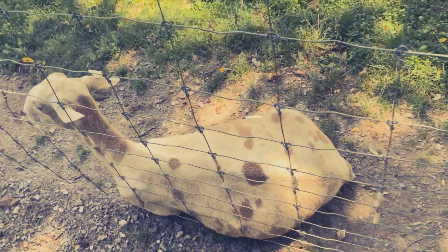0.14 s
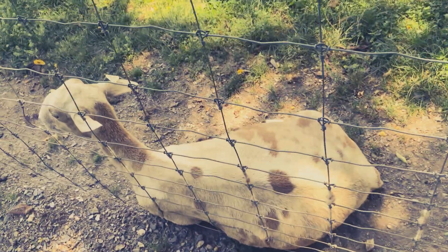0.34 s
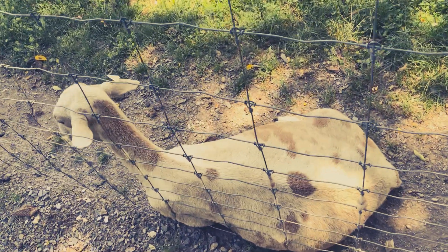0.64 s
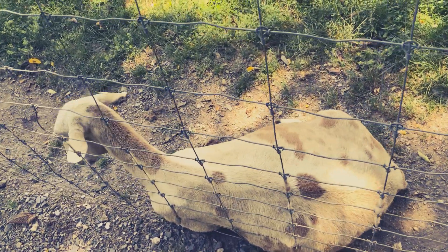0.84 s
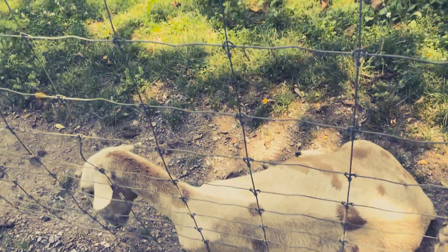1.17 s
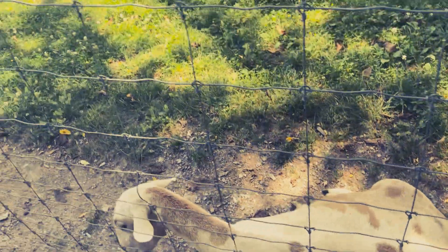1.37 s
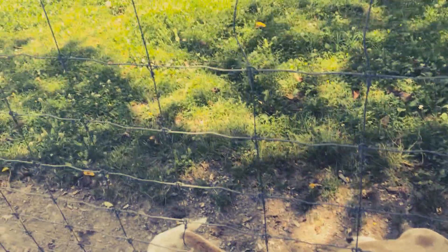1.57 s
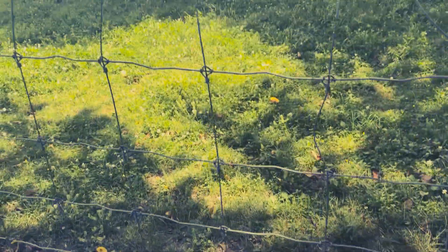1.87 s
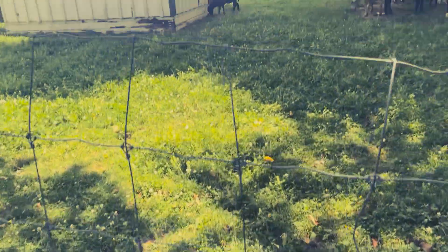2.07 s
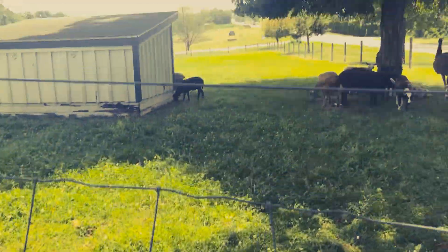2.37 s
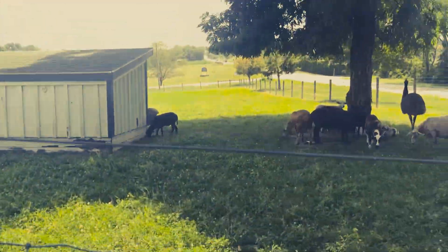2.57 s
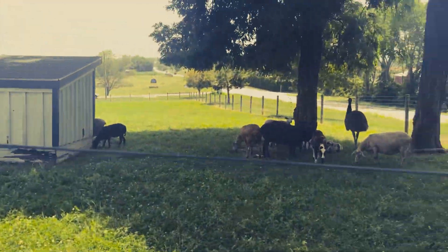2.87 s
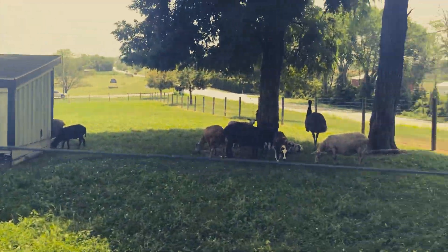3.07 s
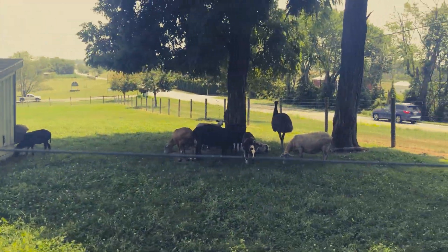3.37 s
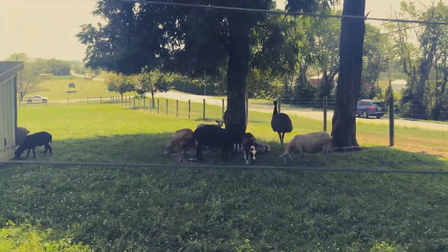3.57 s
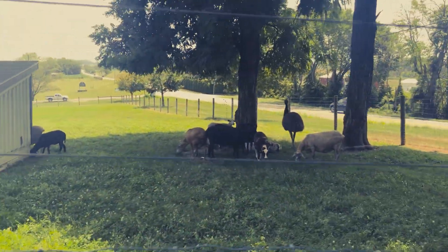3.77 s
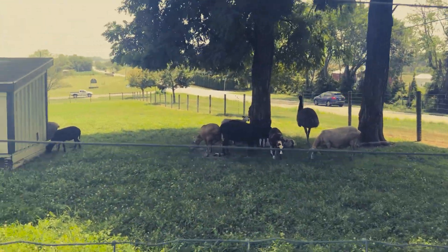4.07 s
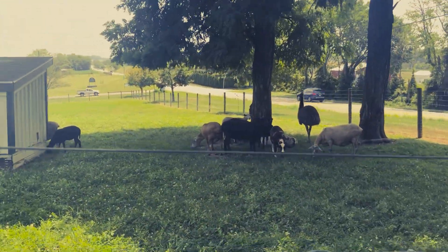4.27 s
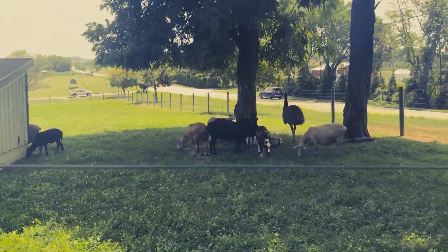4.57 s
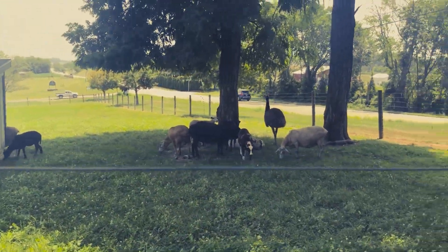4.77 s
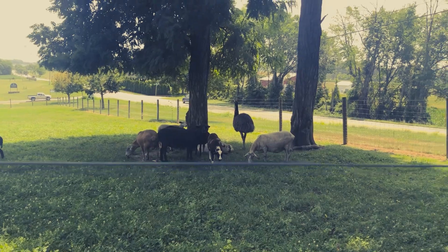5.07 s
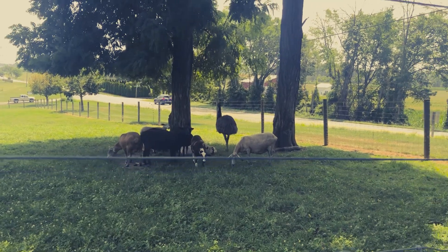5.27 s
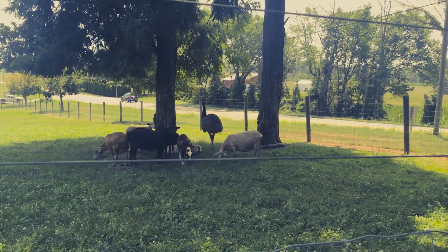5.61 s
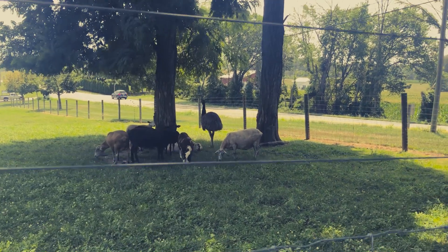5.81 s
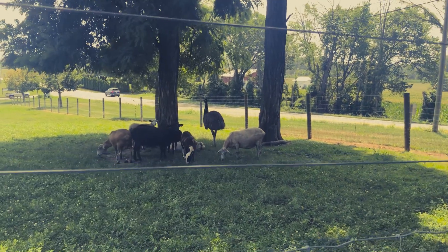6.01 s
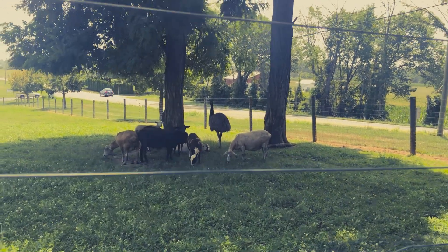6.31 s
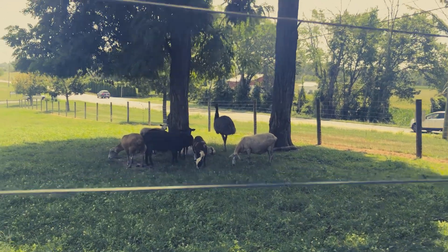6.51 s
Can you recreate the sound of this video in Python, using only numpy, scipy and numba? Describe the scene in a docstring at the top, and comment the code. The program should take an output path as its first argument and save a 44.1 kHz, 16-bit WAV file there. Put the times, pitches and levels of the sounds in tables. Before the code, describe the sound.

A sheep gives one quavering, buzzy bleat just after a car hums past a pasture, over low rumble and tyre noise.

```python
"""A pasture beside a country road, one hand-held microphone. Over low rumble and faintly rustling grass
a car drives up, engine humming and tyres roaring; it is nearest at 3.2 s, and its hum sinks as it passes.
The microphone takes a few soft bumps and puffs of wind. Just after the pass a sheep gives one quavering,
buzzy bleat of a second: its vocal folds snap shut in a train of clicks that ring in throat, nose and
mouth. Then the hum fades down the road while the tyre roar carries on."""
import sys
import numpy as np
from scipy import signal
from scipy.fft import rfft, irfft, next_fast_len
from scipy.io import wavfile
from scipy.ndimage import map_coordinates
from numba import njit

SR = 44100
rng = np.random.default_rng(int(sys.argv[2]) if len(sys.argv) > 2 else 0)


def dump(signal):
    """Clip the signal to [-1, 1] and save it as 16-bit WAV at the path in sys.argv[1]."""
    limited = np.clip(np.atleast_2d(signal).T, -1, 1)
    pcm = np.round(limited * 32767).astype(np.int16)
    wavfile.write(sys.argv[1], SR, pcm)


N = 293204
T = np.arange(N) / SR

# quavers of the bleat, short squeezes of the larynx: t/s, depth (0-1)
QUAVERS = [(3.408, 1), (3.479, 0.97), (3.548, 0.98), (3.625, 0.69), (3.697, 0.75), (3.773, 0.75),
           (3.843, 0.34), (3.913, 0.32), (3.979, 0.28), (4.02, 0.13), (4.052, .22), (4.09, 0.36),
           (4.159, 0.56), (4.232, 0.52), (4.303, 0.9)]


def sheep():
    """One bleat: each quaver lifts the pitch and chokes the buzz, which flares as the larynx lets go."""
    # course of the bleat: t/s, pitch between quavers/Hz, mouth resonance/Hz, effort/dB
    bleat = [(3.33, 172.3, 2660, -32), (3.375, 166.1, 2930, -28), (3.403, 173.5, 2850, -30.5),
             (3.432, 171.1, 3090, -32.5), (3.455, 178.8, 2820, -29), (3.478, 182.2, 2750, -30.8),
             (3.51, 180.5, 2920, -29), (3.545, 184.7, 2710, -32), (3.595, 186.4, 2710, -30),
             (3.625, 187.6, 2660, -30.5), (3.665, 189.9, 2630, -30.5), (3.74, 189.9, 2590, -31.5),
             (3.81, 193.5, 2540, -31.5), (3.89, 192.8, 2550, -31.5), (3.95, 193.8, 2590, -30),
             (4.01, 192.2, 2583, -29.5), (4.065, 191.8, 2630, -29.5), (4.12, 194.8, 2580, -29.5),
             (4.19, 191.6, 2654, -29.5), (4.232, 191.3, 2685, -27), (4.263, 184.2, 3000, -27.8),
             (4.3, 183, 2800, -29), (4.33, 174.3, 3330, -23.5)]
    pitch, mouth_hz, effort_db = in_time(bleat)
    mouth_rest_hz = 2594
    raised = np.log2(mouth_hz / mouth_rest_hz)   # octaves above rest
    choke = squeeze(delay=-0.0036, length=0.0099)
    voice = larynx(pitch, effort_db, raised, choke)
    voice = vocal_tract(voice, mouth_hz, mouth_rest_hz, raised, choke)
    return pasture(voice + peeps(), ground_s=0.00235, ground_db=-16.5, scatter_db=-15, t60=0.13)


def larynx(pitch, effort_db, raised, choke):
    """The folds start abruptly, buzz and are cut off; the harder they snap shut, the more treble."""
    start_s, stop_s = 3.367, 4.318
    push = squeeze(delay=0, length=0.009)
    release = squeeze(delay=0.0048, length=0.0093) ** 2
    slack = squeeze(delay=0.021, length=0.0067) ** 2   # only deep quavers leave the voice slack
    level_db = effort_db + 6.3 * release + 0.3 * push ** 2 - 2.8 * slack
    envelope = ramp(start_s, 0.021) * (1 - ramp(stop_s, 0.015))
    pitch = pitch * (1 + 0.19 * push)
    voice = glottis(pitch, jitter=0.00699, shimmer_db=0.5, rasp=0.015, hiss=0.0085, spit=0.16)
    voice = voice * envelope * from_db(level_db)
    # the buzz takes a moment to build, and dulls as the mouth resonance rises
    snap_db = -0.3 - 24 * (1 - ramp(start_s, 0.055)) - 32 * raised
    snap_db += release - 13 * choke ** 1.65 + 4 * slack + 4 * flare(delay=0.0033, length=0.034)
    voice = treble(voice, 5000, snap_db)
    edge_db = 0.08 * snap_db + 4.2 * release + 2.2 * drift(150) - 4.5   # no two closures are alike
    voice = treble(voice, 9300, edge_db)
    # the flow is cut off at each closure, so the pressure drops first
    return -signal.sosfilt(signal.butter(1, 380, "high", fs=SR, output="sos"), voice)


def glottis(pitch, jitter, shimmer_db, rasp, hiss, spit):
    """Each closure of the folds gives a click, a wet spit and a puff of turbulence, over a steady leak."""
    cycles = np.cumsum(pitch * (1 + jitter * drift(170))) / SR
    closures = np.interp(np.arange(1, int(cycles[-1])), cycles, np.arange(N))
    taps = np.clip(closures.astype(int)[:, None] + np.arange(-5, 7), 0, N - 1)
    clicks = np.zeros(N)
    clicks[taps] = np.sinc(taps - closures[:, None])
    turbulence = (rasp * np.exp(-(cycles % 1) / 0.49) + hiss) * rng.standard_normal(N)
    spray = spit * np.exp(-(cycles % 1) / 0.059) * rng.standard_normal(N)
    spray = signal.sosfilt(signal.butter(2, 10000, "high", fs=SR, output="sos"), spray)
    return clicks * from_db(shimmer_db * drift(190)) + turbulence + spray


def vocal_tract(voice, mouth_hz, mouth_rest_hz, raised, choke):
    """Mouth, throat and nose resonate in series; each quaver pulls the mouth resonance down."""
    # the mouth opens slowly: t/s, lowest resonance/Hz, factor on the bright resonances, opening (0-1)
    gape = [(3.37, 860, .97, 0), (3.48, 855, 0.98, .1), (3.62, 865, 0.97, 0.5), (3.82, 866, 0.99, 0.7),
            (4.0, 940, 0.99, 1), (4.17, 929, 0.97, 0.91), (4.33, 880, 1.02, 0.83)]
    # resonances and a hollow of throat and nose: base f/Hz, width/Hz, gain/dB
    throat = [(396, 113, 17.5), (1420, 590, -11.5), (3260, 580, 9), (4180, 410, 3.5), (5730, 450, 3.5),
              (10400, 900, 0.5)]
    # bright resonances and hollows: base f/Hz, width/Hz, gain nearly shut/dB, gain wide open/dB
    bright = [(6900, 640, 21, 21), (7400, 370, 6.5, 4.5), (7850, 220, -5, -3), (8050, 130, 11, 10),
              (9360, 230, 10.5, 12.5), (9920, 140, 10, 10.5), (11950, 700, 6, -2), (13500, 1300, 4, 6)]
    low_hz, stretch, opening = in_time(gape)
    wobble = 0.011   # share of a resonance's frequency
    quavering_hz = mouth_hz * (1 - 0.075 * squeeze(delay=-0.003, length=0.017) + wobble * drift(90))
    voice = resonance(voice, quavering_hz, 209, 29.2 - 2.9 * choke ** 2)
    lower_hz = 2137 * (quavering_hz / mouth_rest_hz) ** 0.26   # loosely follows the mouth
    voice = resonance(voice, lower_hz, 192, 14.4 + 0.5 * choke - 10 * raised + 0.8 * drift(90))
    quaver_ring_db = 6.1 + 7.9 * squeeze(delay=-0.003, length=0.011)
    voice = resonance(voice, 1840, 163, quaver_ring_db)
    push = squeeze(delay=0, length=0.009)
    voice = resonance(voice, low_hz, 108, 26.5 - 2 * opening + 3 * push ** 2 - 11 * raised)
    for hz, width, db in throat:
        voice = resonance(voice, hz * (mouth_hz / 2550) ** 0.072, width, db)
    for hz, width, shut_db, open_db in bright:
        centre_hz = hz * stretch * (1 - 0.013 * choke + wobble * drift(30))
        voice = resonance(voice, centre_hz, width, shut_db + (open_db - shut_db) * opening)
    return voice


def squeeze(delay, length):
    """A bell-shaped swell for every quaver."""
    coarse = T[::20]
    bells = sum(depth * np.exp(-0.5 * ((coarse - s - delay) / length) ** 2) for s, depth in QUAVERS)
    return np.interp(T, coarse, bells)


def flare(delay, length):
    """A quick rise and a slow ebb after every quaver."""
    return sum(depth * ramp(s + delay, 0.005) * np.exp(-np.maximum(T - s - delay, 0) / length)
               for s, depth in QUAVERS)


def peeps():
    """A tiny peep before the bleat and a squeak after it: the folds flutter softly for a few cycles."""
    # flutters: t/s, level/dB, half length/s, pitch/Hz, band centre/Hz, band width/Hz
    flutters = [(3.33, -42, 0.011, 176, 2640, 420), (4.341, -35.5, 0.0065, 442, 3200, 1900)]
    out = 0
    for s, db, length, pitch, hz, width in flutters:
        flutter = glottis(pitch, jitter=0.008, shimmer_db=2.5, rasp=0.02, hiss=0.007, spit=0)
        band = signal.butter(2, [hz - width / 2, hz + width / 2], "band", fs=SR, output="sos")
        out = out + swell(s, db, length) * rms_one(signal.sosfilt(band, flutter))
    return out


def pasture(x, ground_s, ground_db, scatter_db, t60):
    """The ground returns one quick echo; fence, shed and trees scatter a faint, dull tail."""
    ground = from_db(ground_db) * np.interp(T - ground_s, T, x)
    age = T[:SR // 2]
    tail = signal.sosfilt(signal.butter(2, 5000, fs=SR, output="sos"), rng.standard_normal(len(age)))
    tail *= from_db(-60 * age / t60)
    return x + ground + from_db(scatter_db) * signal.fftconvolve(x, tail / np.linalg.norm(tail))[:N]


def car():
    """A car passes the microphone; engine and tread sink in pitch as it turns from coming to going."""
    pass_s, distance_s = 3.2, 1.65   # when it is nearest; its distance then, in driving time
    receding = (T - pass_s) / np.hypot(T - pass_s, distance_s)   # -1 coming, +1 going
    doppler = 1 - 0.1134 * receding
    return engine(doppler) + tyres(doppler)


def engine(doppler):
    """The hum carries from afar and wavers in the air; a whine and a low noise swell at close range."""
    # course of the hum: t/s, relative level/dB
    hum_level = [(0, -50), (.3, -47.5), (.7, -44.5), (1.05, -40.5), (1.3, -34.5), (1.8, -35.5), (2.12, -39),
                 (2.4, -32.5), (2.58, -39.5), (2.76, -32.5), (2.9, -36), (3.08, -32), (3.6, -36.5),
                 (4.1, -39.5), (4.5, -43.5), (4.8, -39.5), (5.2, -47), (5.55, -48), (5.9, -44.5),
                 (6.65, -49)]
    # low engine orders, heard from afar: multiple of the hum, relative level/dB
    far_orders = [(1 / 2, -19), (1, 0), (4 / 3, -18.5)]
    # higher orders, heard close by: multiple of the hum, relative level/dB
    close_orders = [(7 / 3, -16), (8 / 3, -15)]
    # spectrum of the car's low noise: f/Hz, relative level/dB
    body_spectrum = [(150, 11.5), (235, 7), (320, -3.5), (470, -1), (650, -2), (850, -2.5), (1200, -15),
                     (2500, -42)]
    hum_db, = in_time(hum_level)
    passing_hum_hz = 171.3
    cycles = np.cumsum(passing_hum_hz * doppler * (1 + 0.00325 * drift(12))) / SR
    phase = 2 * np.pi * cycles
    close = swells([(2.95, -40.5, 0.8)], rest_db=-52)
    hum = sum(from_db(hum_db + db + 2.5 + 0.6 * drift(14)) * np.sin(order * phase)
              for order, db in far_orders)
    whine = sum(from_db(db + 3.5 * drift(18)) * np.sin(order * phase + 0.87 * drift(25))
                for order, db in close_orders)
    body = from_db(3 + 0.88 * drift(16)) * noise(body_spectrum)
    return hum + close * (whine + body)


def tyres(doppler):
    """The tyres roar and hiss on the road, and their tread sings in a narrow, sinking band of noise."""
    # relative levels along the road: t/s, roar/dB, upper roar/dB, hiss/dB
    levels = [(0.2, -47.5, -54.5, -63.5), (.55, -48, -51.5, -58.5), (1.0, -46.5, -53, -59),
              (1.35, -43, -49.5, -61), (1.6, -45.5, -54, -59), (1.85, -45.5, -54.5, -57),
              (2.5, -44.5, -52, -55), (3.7, -46.5, -50, -52.5), (4.7, -44.5, -47.5, -57.5),
              (5.3, -45.5, -50, -57), (5.8, -45.5, -53.5, -55), (6.25, -46.5, -49.5, -55),
              (6.65, -46, -50.3, -61.5)]
    # spectra of the roar, its brighter part and the hiss: f/Hz, relative level/dB
    roar_spectrum = [(450, -17.5), (680, -5), (850, 1.5), (1050, 1), (1400, -2.5), (1800, -11.5),
                     (2500, -17), (4500, -30.5)]
    upper_spectrum = [(1000, -7), (1600, 1.5), (2000, 0), (2500, -5.5), (3200, -9.5), (5000, -24)]
    hiss_spectrum = [(1500, -14), (2400, -1.5), (3200, 1), (4500, -1), (6500, -5.5), (9000, -13),
                     (15000, -32)]
    roar_db, upper_db, hiss_db = in_time(levels)
    roar = from_db(roar_db + 3 + 0.45 * drift(12)) * noise(roar_spectrum)
    roar += from_db(upper_db + 2) * noise(upper_spectrum)
    hiss_gain = swells([(2.79, -53, 0.28)], rest_db=hiss_db)   # swells as the car drives up
    hiss = hiss_gain * from_db(2.5 + 0.5 * drift(18)) * noise(hiss_spectrum)
    tread_hz, width_hz = 832 * doppler, 98
    tread = two_pole(noise(roar_spectrum), 2 * np.pi * tread_hz / SR, np.exp(-np.pi * width_hz / SR))
    return roar + hiss + swell(s=2.4, db=-48, length=0.66) * rms_one(tread)


def bumps():
    """Soft bumps on the hand-held microphone, each a low thud of a few cycles."""
    # thuds: t/s, level/dB, f/Hz, half length/s
    thuds = [(3.205, -30, 89, .012), (3.257, -23.5, 197, 0.0078), (3.284, -29, 115, 0.01),
             (3.6, -18.5, 157, 0.0053), (5.456, -30.5, 120.2, 0.0033)]
    return sum(swell(s, db, length) * np.cos(2 * np.pi * hz * (T - s)) for s, db, hz, length in thuds)


def rumble():
    """An uneven low rumble of road and air."""
    # course of the rumble: t/s, level/dB
    levels = [(0, -43.5), (4.2, -45.5), (4.6, -45), (6.65, -47)]
    # its spectrum: f/Hz, relative level/dB
    spectrum = [(20, -23), (40, -10), (60, 0.5), (80, -1.5), (110, -3), (145, -1), (200, -5), (245, -11),
                (320, -18), (600, -44)]
    level_db, = in_time(levels)
    return from_db(level_db + 2.9 * drift(22) + 1.6 * drift(5)) * noise(spectrum)


def wind():
    """Low puffs of wind on the microphone."""
    # puffs: t/s, level/dB, half length/s
    puffs = [(1.55, -44, 0.15), (3.26, -36, 0.06), (3.87, -37.5, 0.21)]
    # their spectrum: f/Hz, relative level/dB
    spectrum = [(20, -28), (45, -2), (80, 3.5), (115, 0), (150, 2), (220, -13), (320, -16), (600, -45)]
    return swells(puffs, rest_db=-58) * from_db(2 * drift(22.15)) * noise(spectrum)


def grass():
    """A faint, high rustle that comes in swells, and two stalks that snap."""
    # rustles: t/s, level/dB, half length/s
    rustles = [(0.03, -63, 0.053), (.87, -57.5, 0.066), (.95, -63.5, 0.89), (1.85, -55.5, 0.15),
               (2.85, -59, 0.58), (4.02, -55, 0.18), (5.65, -66.5, 0.47), (6.22, -66, .06)]
    # dry ticks of the stalks: t/s, level/dB
    ticks = [(1.165, -56), (1.213, -49)]
    # spectrum of both: f/Hz, relative level/dB
    spectrum = [(3000, -23), (6500, -1), (9000, 4), (12000, 2), (16000, 2)]
    snaps = sum(from_db(db) * np.exp(-np.abs(T - s) / 0.00089) for s, db in ticks)
    return (swells(rustles, rest_db=-85) * from_db(drift(12)) + snaps) * noise(spectrum)


def from_db(db):
    """Decibels to gain."""
    return 10 ** (np.asarray(db) / 20)


def rms_one(x):
    """Scale to unit power."""
    return x / np.sqrt(np.mean(x ** 2) + 1e-20)


def in_time(rows):
    """One curve for each column after the time, joined by straight lines."""
    s, *columns = np.transpose(rows)
    return [np.interp(T, s, c) for c in columns]


def ramp(s, length):
    """Goes from 0 to 1, starting at s."""
    return np.clip((T - s) / length, 0, 1)


def swell(s, db, length):
    """A bell-shaped rise and fall of gain around a moment."""
    return from_db(db) * np.exp(-0.5 * np.minimum(((T - s) / length) ** 2, 100))


def swells(rows, rest_db):
    """Gain that swells above a resting level; rows are t/s, level/dB, half length/s."""
    return np.sqrt(from_db(rest_db) ** 2 + sum(swell(s, db, length) ** 2 for s, db, length in rows))


def drift(rate):
    """A smooth random curve that changes about rate times a second; spread about 1."""
    knots = rng.standard_normal(4000)
    positions = np.arange(0, N, 20) / SR * rate + 5
    return map_coordinates(knots, [positions], order=3, mode="wrap").repeat(20)[:N]


def noise(spectrum):
    """Noise with the given colour; rms 1."""
    hz, db = np.transpose(spectrum)
    size = next_fast_len(N)
    bins = np.maximum(np.fft.rfftfreq(size, 1 / SR), 1)
    skirts = np.minimum(bins / hz[0], 1) ** 2 * np.minimum(hz[-1] / bins, 1) ** 2
    colour = from_db(np.interp(np.log(bins), np.log(hz), db)) * skirts
    return rms_one(irfft(rfft(rng.standard_normal(size)) * colour, size)[:N])


@njit
def two_pole(x, angle, radius):
    """Band-pass with a moving centre and gain 1 on top."""
    y = np.zeros(len(x))
    for i in range(2, len(x)):
        drive = (1 - radius ** 2) / 2 * (x[i] - x[i - 2])
        y[i] = drive + 2 * radius * np.cos(angle[i]) * y[i - 1] - radius ** 2 * y[i - 2] + 1e-18
    return y


def resonance(x, hz, width, db):
    """Lifts (or hollows) one band and lets the rest pass; centre and lift may be curves."""
    band = two_pole(x, 2 * np.pi * hz / SR * np.ones(N), np.exp(-np.pi * width / SR))
    return x + (from_db(db) - 1) * band


def treble(x, corner_hz, db):
    """Raises or lowers everything above the corner."""
    low, high = (np.tile(signal.butter(2, corner_hz, kind, fs=SR, output="sos"), (2, 1))
                 for kind in ("low", "high"))
    return signal.sosfilt(low, x) + from_db(db) * signal.sosfilt(high, x)


def scene():
    """Pasture and road reach one microphone."""
    return (sheep() + car() + rumble() + wind() + grass() + bumps())[None]


def record(dry):
    """The top is cut steeply."""
    cutoff_hz = 15700
    return signal.sosfilt(signal.ellip(12, 0.1, 90, cutoff_hz, fs=SR, output="sos"), dry)


dry = scene()
out = record(dry)
dump(out)
```